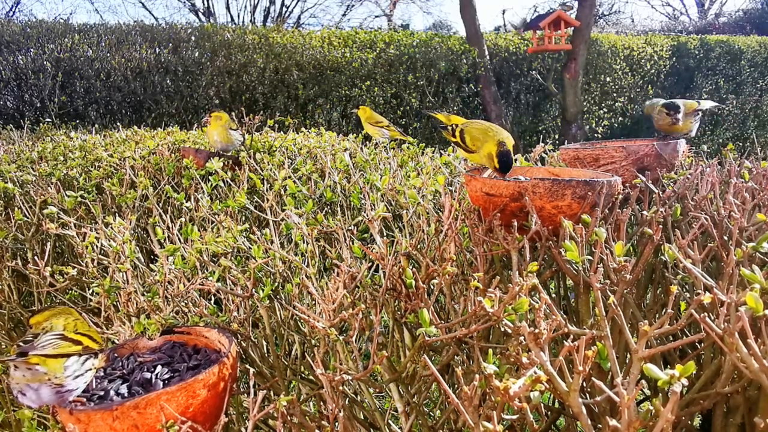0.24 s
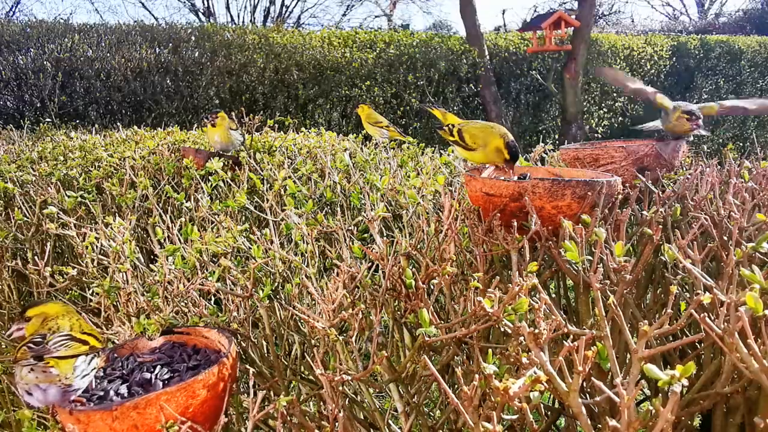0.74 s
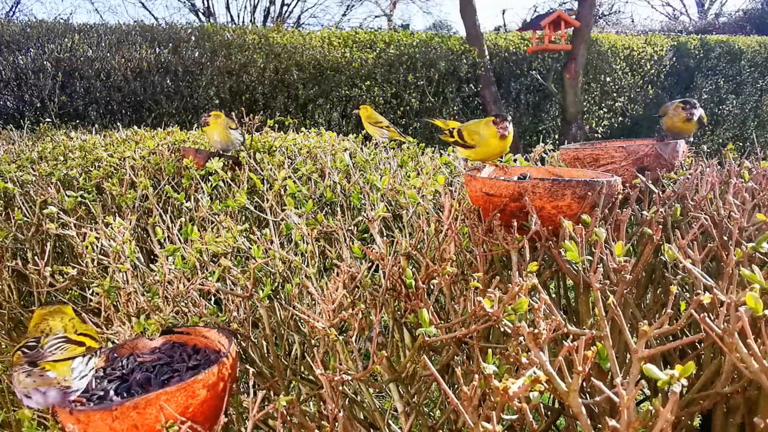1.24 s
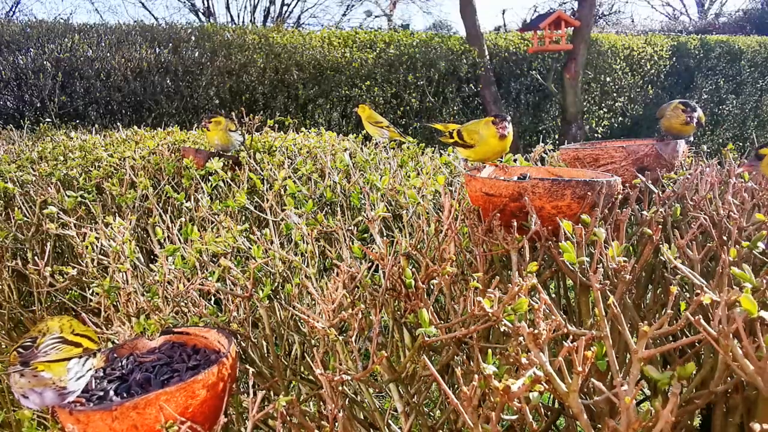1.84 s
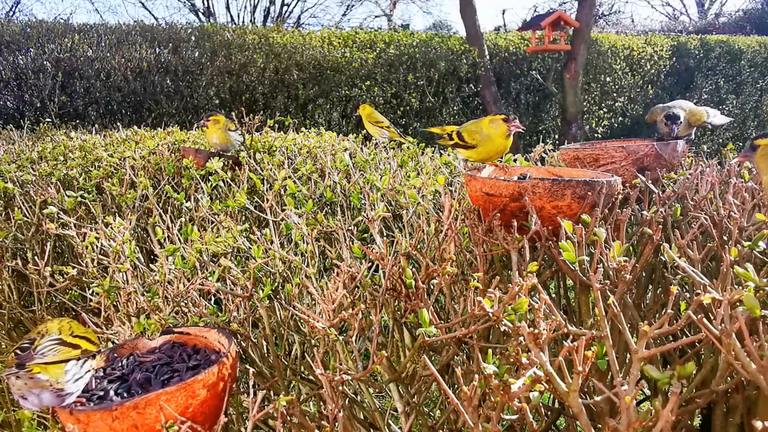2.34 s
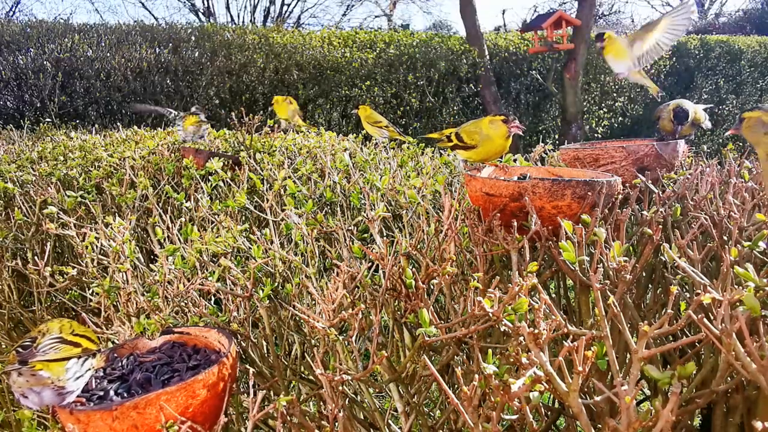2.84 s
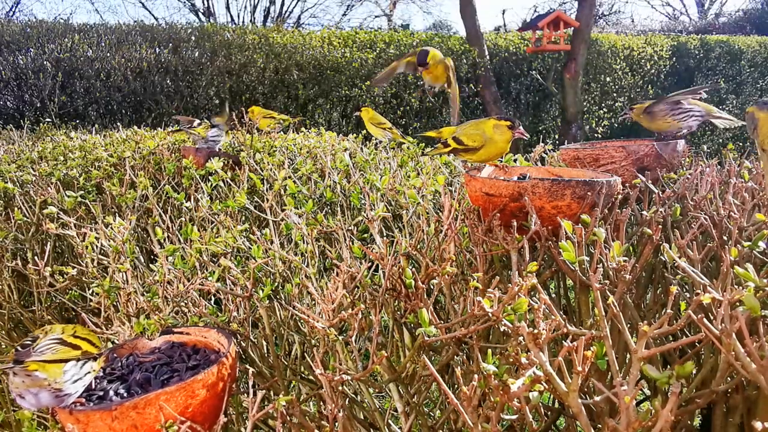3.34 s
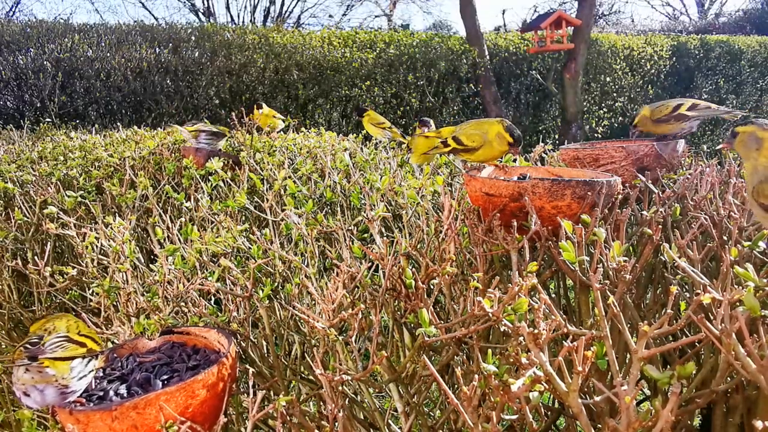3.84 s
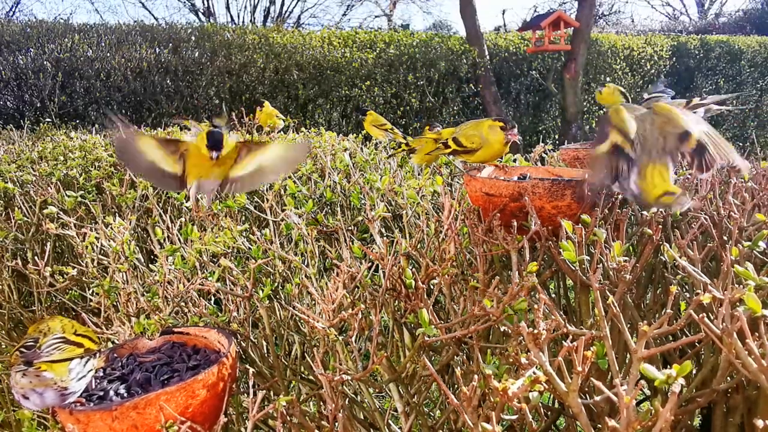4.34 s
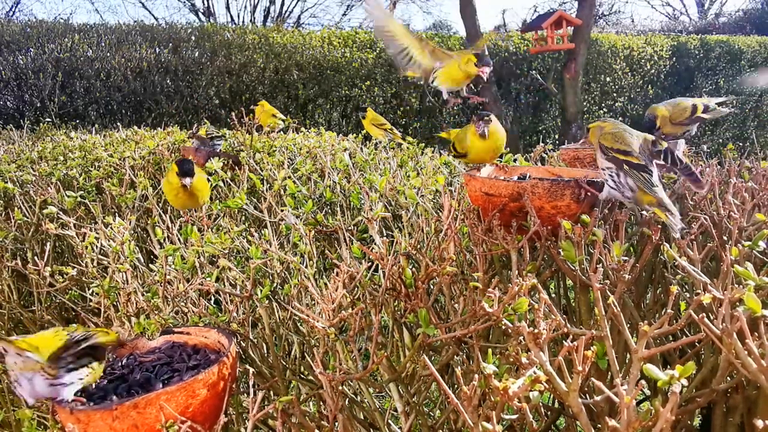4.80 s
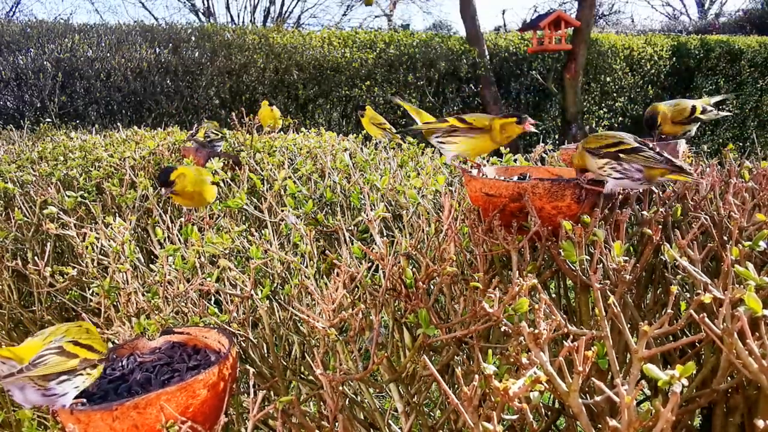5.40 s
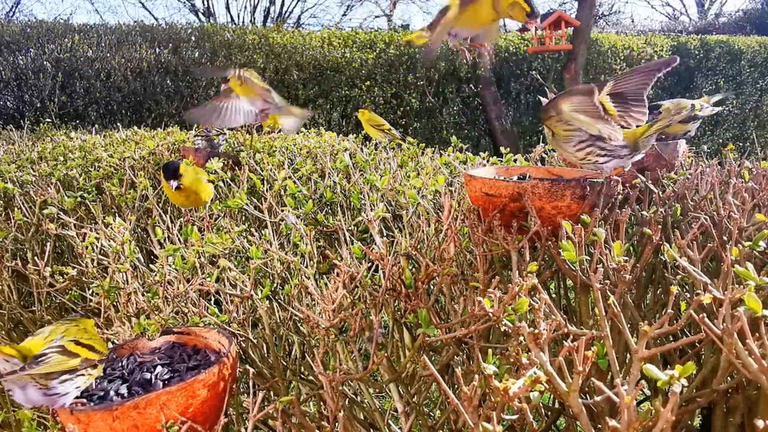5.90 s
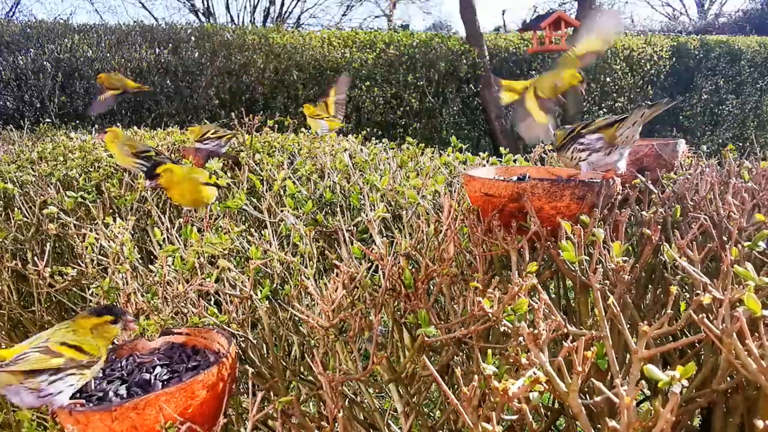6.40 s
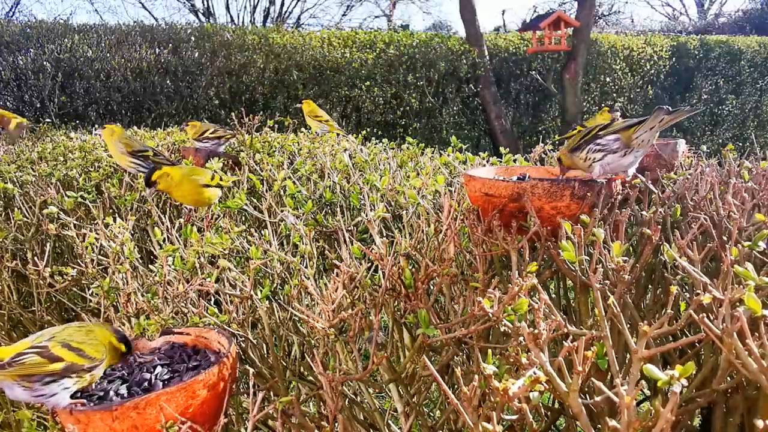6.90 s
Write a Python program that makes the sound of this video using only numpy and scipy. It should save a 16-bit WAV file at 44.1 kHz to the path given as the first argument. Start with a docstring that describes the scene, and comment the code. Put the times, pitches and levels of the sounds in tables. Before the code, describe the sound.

Siskins squabble at seed feeders along a hedge: high sliding whistles, tiny chirps and scratchy bursts, fairly sparse at first, then busier. Soft whirring wingbeats come and go, heaviest around five to six and a half seconds, ending in scrabbling and pecking among husks. A dove coos far off throughout, and twitter hangs in the leaves. Short outdoor echoes, a quiet hush and low puffs of air reach the nearby stereo microphone.

```python
"""A garden hedge with seed feeders, where siskins whistle, chatter and squabble close by.
Whistles are gliding tones; chatter is shaky harmonics mixed with noise and shaped by a throat filter.
Wings whirr in bursts of beats, beaks and claws tick on seeds and twigs, and hedge and walls echo the birds.
Further off the flock twitters and a collared dove repeats its three-note coo.
A light breeze, with puffs of air from the wings, and the garden's hush are filtered noise."""
import sys
import numpy as np
from scipy import signal
from scipy.fft import rfft, irfft, next_fast_len
from scipy.io import wavfile

SR = 44100
rng = np.random.default_rng(int(sys.argv[2]) if len(sys.argv) > 2 else 0)


def master(y):
    """Save y as 16-bit WAV."""
    cut = np.clip(np.atleast_2d(y).T, -1, 1)
    pcm = np.round(cut * 32767)  # scale
    wavfile.write(sys.argv[1], SR, pcm.astype(np.int16))


N = 315315

# Levels in the tables are relative: many layers are trimmed as a whole later on.
# Falling whistles: t/s, length/s, first f/Hz, last f/Hz, bend (over 1 hangs before the dive, under 1 dives
# at once), level/dB, loudest moment (share of the length), roughness (0-1)
FALLING_WHISTLES = [(0.182, 0.18, 4250, 1950, 2.73, -50.5, 0.8, 0.03),
                    (0.229, 0.13, 5350, 2254, 1.44, -49.5, 0.3, 0.11),
                    (0.582, 0.074, 4580, 3220, 0.92, -51, 0.16, 0.63),
                    (1.14, 0.13, 5500, 2470, 1.44, -40, 0.095, 0.12),
                    (1.355, 0.13, 6280, 1983, 0.99, -41.5, 0.27, 0.13),
                    (2.012, 0.075, 5230, 4510, 0.83, -42, 0.32, 0.05),
                    (2.066, 0.2, 4740, 2130, 1.24, -51, 0.44, 0),
                    (2.546, 0.1, 5560, 2740, 2, -38.5, 0.69, 0.23),
                    (2.756, 0.125, 5860, 1970, 1.1, -45, 0.42, 0.15),
                    (2.894, 0.06, 2460, 1665, 1.2, -47, 0.095, 0.28),
                    (2.909, 0.1, 4500, 2650, 0.84, -48.5, 0.33, 0.3),
                    (3.09, 0.1, 5800, 4460, 0.73, -55.5, 0.4, 0),
                    (3.506, 0.071, 5540, 4460, 0.73, -42.5, 0.28, 0),
                    (3.579, 0.16, 4660, 2560, 0.82, -48.5, 0.52, 0.06),
                    (3.836, .15, 5630, 1990, 0.9, -50.5, 0.55, 0.13),
                    (4.461, .11, 5530, 2003, 1.06, -44, 0.38, 0.39),
                    (4.5, .18, 4994, 4210, 0.61, -45.5, 0.31, 0),
                    (4.999, .11, 4830, 2640, 0.94, -39, 0.46, .15),
                    (5.877, 0.15, 4780, 2773, 0.97, -48, 0.57, 0.06),
                    (6.917, 0.096, 5573, 2510, 1.6, -35.5, 0.36, 0.24),
                    (7.096, 0.043, 4300, 3307, 0.69, -45.5, 0.54, 0.5)]
# Short tweets and thin held notes: t/s, length/s, first f/Hz, last f/Hz, level/dB, roughness (0-1)
TWEET_NOTES = [(0, 0.032, 4540, 4490, -47.5, 0.24), (0.818, 0.061, 4690, 4157, -44, 0.83),
               (0.866, 0.05, 4240, 5100, -49, 0.5), (1.137, 0.032, 5580, 5620, -40, 0),
               (1.486, 0.17, 4016, 4040, -56.5, 0.17), (1.55, 0.028, 4500, 4720, -45, 0),
               (1.597, 0.04, 5500, 5630, -60.5, 0.04), (1.931, 0.03, 5070, 3750, -55.5, 0.54),
               (1.967, 0.062, 6100, 5530, -57, 0.14), (2.393, 0.067, 4270, 4440, -60.5, .1),
               (2.4, 0.06, 5650, 5650, -65, 0), (2.86, 0.042, 2300, 3220, -50.5, 0.4),
               (3.09, 0.069, 6200, 5900, -57, 0), (3.187, 0.045, 4610, 5130, -56.5, 0.25),
               (3.426, 0.037, 4010, 4220, -49, 0.16), (3.43, 0.066, 6250, 6610, -56.5, 0.27),
               (3.485, 0.026, 4470, 4920, -46, 0.27), (3.563, 0.043, 4850, 4560, -47.5, 0),
               (3.727, 0.021, 4450, 4800, -46.5, 0.08), (4.122, 0.057, 4000, 5133, -46.5, 0.62),
               (4.544, 0.073, 5370, 5130, -52, 0), (4.856, 0.014, 3300, 3660, -48, 0.24),
               (4.918, 0.0197, 3464, 3990, -44.5, 0.24), (4.941, 0.033, 5500, 5910, -49.5, 0.1),
               (4.948, 0.068, 2815, 3510, -42.5, 0.81), (4.969, 0.051, 4120, 5040, -52, 0.56),
               (5.019, 0.069, 5990, 5260, -49, 0.58), (5.132, 0.023, 3840, 4020, -40.5, 0.2),
               (5.428, 0.0268, 3680, 3503, -51, 0.12), (5.525, 0.022, 4440, 5000, -52, 0.3),
               (5.866, 0.056, 4430, 4560, -48, 0.13), (5.982, 0.048, 4234, 4230, -51, 0.03),
               (6.703, 0.062, 3663, 3830, -56, 0.2), (6.787, 0.15, 4870, 5170, -61.5, 0.42),
               (6.836, 0.1, 4050, 4010, -56, 0.05)]
HOOK_S = .022  # every whistle opens with a faint upward hook
BEAK_HZ, LOW_NOTE_DB = 4260, -7.5  # a small beak radiates low notes poorly: dB an octave below this pitch
TWIN_RATIO, TWIN_DB = .87, -10  # the other side of the syrinx (the voice organ) sings lower and weaker

# Harsh chatter notes: middle t/s, length/s, level/dB, centre f/Hz,
# narrowness/dB (drop an octave off centre, sign ignored), left over right/dB
CHATTER_NOTES = [(.082, 0.027, -42, 4570, 2.5, 0), (.39, 0.099, -36, 4050, 20, 1),
                 (.445, 0.062, -44.5, 3530, 13, 1), (0.663, 0.097, -38.5, 4950, 4.5, -1),
                 (0.709, 0.034, -27.5, 1960, 5.5, -2.5), (0.857, 0.056, -33, 5200, 6, 1),
                 (2.468, 0.045, -38, 3760, 3, 3), (2.54, 0.049, -27.5, 5500, -1, 0),
                 (2.592, 0.027, -33.5, 5000, -1, -1), (2.66, 0.026, -31, 5600, 0.5, -0.5),
                 (2.745, 0.029, -30.5, 7000, 0.5, -0.5), (3.225, .07, -44.5, 4200, 33, -4),
                 (3.289, 0.036, -45, 3600, 2, 1), (3.355, 0.036, -39, 4240, 9, 0.5),
                 (3.587, 0.034, -35, 5170, 2.5, 1), (3.652, 0.027, -35, 3930, 3, 2),
                 (3.727, 0.025, -34.5, 4260, 3, 1), (4.167, 0.037, -32.5, 3760, 10, 0),
                 (4.277, 0.042, -37, 3760, 12, -1), (4.325, 0.039, -35, 4120, 4, 0),
                 (4.352, 0.036, -31.5, 3760, 8, 0), (4.444, 0.064, -29.5, 6100, 2.5, 2),
                 (4.519, 0.032, -34.5, 4600, 3.5, 0), (4.617, 0.037, -33.5, 3850, 17, -1.5),
                 (5.187, 0.039, -20.5, 5760, 3, 2.5), (5.275, 0.041, -34, 3700, 13, -3),
                 (5.3, 0.029, -20, 3460, 1.5, 0.5), (5.372, 0.023, -29, 5900, 0, -10),
                 (5.453, 0.035, -30.5, 5050, 2.5, -5), (5.526, 0.034, -29, 6290, 2, -1),
                 (5.648, 0.031, -35, 4860, 2, -5), (5.695, 0.058, -38, 5170, 0.5, 1),
                 (5.743, 0.037, -36.5, 3970, 4.5, -4), (5.774, 0.044, -38.5, 4670, 3.5, 0),
                 (5.851, 0.052, -34.5, 4300, 5, -1)]
# Filter of the throat: f/Hz, level/dB
THROAT_FILTER = [(900, -25.5), (1450, -6), (2300, 1), (5000, 5), (7000, 0), (8500, -9.5), (11000, -4.5),
                 (15000, -19)]

# Bursts of wingbeats: t/s, length/s, beats per second, air push level/dB, feather swish level/dB,
# left over right/dB
WING_BURSTS = [(0.662, 0.32, 21.5, -54, -59.5, 0), (1.838, 0.11, 23, -39, -77, -4),
               (2.721, 0.42, 20.5, -47, -56, 1.5), (3.966, 0.28, 22.7, -68, -55, 1),
               (5.077, 0.416, 22, -24, -53, 2.5), (5.597, 0.095, 23, -38, -79, 19),
               (6.112, 0.29, 20.1, -36.5, -54.5, -0.5), (6.303, 0.3123, 26, -33.5, -52.5, 3),
               (6.38, 0.34, 23.5, -44, -52.5, -0.5), (6.549, 0.16, 23.5, -44, -51.5, 3),
               (6.984, 0.18, 20.4, -41, -50.5, -2)]
# Colour of the feather swish: f/Hz, level/dB
FEATHER_COLOUR = [(300, 7.5), (1100, 1.5), (2500, 7), (6000, -7), (9000, 1), (11000, 0), (15000, -11.5)]
# Colour of the duller wing whirr: f/Hz, level/dB
WHIRR_COLOUR = [(40, -11.5), (170, 5), (450, -13), (900, -20.5), (3000, -38)]

# Ticks of beak or claw: t/s, level/dB, centre f/Hz, left over right/dB
BEAK_AND_CLAW_TICKS = [(0.162, -31, 5000, -2), (0.7244, -31.5, 6500, -5.5), (1.3129, -37, 5430, -4),
                       (1.7462, -50, 4380, -12), (1.8674, -48.5, 4700, -18), (6.4258, -24.5, 7975, 0),
                       (6.5099, -26, 1499, -1), (6.55, -31, 7500, -5), (6.562, -21.5, 1400, 3),
                       (6.622, -28, 5000, -3), (7.0365, -18.5, 7500, -2)]
# Colour of a cracking husk: f/Hz, level/dB
HUSK_COLOUR = [(300, 13), (1500, 9), (4000, 7), (8000, 9), (11000, 7.5), (16000, 1.5)]
RUSTLE_FROM_S, RUSTLE_TO_S = 6.15, 6.69  # a landing bird scrabbles for a hold among the seeds

# Loudness of the flock twittering in the hedge: t/s, level/dB
FLOCK_LEVEL = [(0, -56), (0.4, -55), (1.1, -58), (1.65, -66), (2.35, -70), (2.69, -57), (3.05, -62),
               (3.55, -55), (3.96, -62), (4.4, -53), (4.72, -65), (4.95, -52), (5.35, -47), (5.62, -59),
               (6.21, -63), (6.97, -62), (7.15, -48)]

# The dove's phrase, one row a coo: t/s into the phrase, length/s, length/s of its low opening,
# top f/Hz, last f/Hz, level/dB
DOVE_COOS = [(0, .22, .06, 690, 668, -1.5), (.30, .46, .05, 668, 555, -2.5),
             (.98, .25, .035, 655, 470, -1.5)]
FIRST_PHRASE_S, PHRASE_EVERY_S = -.677, 1.617
COO_LOW_HZ, COO_LOW_DB = 512.5, 7  # every coo opens on a louder low note, then breaks upward

# Air moving over the microphone, easing at first and then freshening: t/s, level/dB
BREEZE_LEVEL = [(0, -61), (2.1, -69.5), (3.4, -59), (4.9, -48.5), (6.3, -49), (7.15, -48)]
# Colour of the breeze: f/Hz, level/dB
BREEZE_SPECTRUM = [(15, 0), (30, -4.5), (55, 1), (80, -7), (130, -14.5), (250, -20), (600, -35),
                   (2000, -47)]
# Swells and short puffs of low air, many of them stirred by passing wings:
# peak t/s, half width/s, peak level/dB
AIR_PUFFS = [(.8, 0.51, -55.5), (1.89, 0.028, -50.5), (2.3, 1, -58.5), (3.02, 0.14, -59.5),
             (3.698, 0.062, -49), (5.33, 0.33, -45), (5.65, 0.051, -45.5), (5.94, 0.089, -51),
             (7.13, 0.18, -39.5)]
# Colour of the garden's hush: f/Hz, level/dB per Hz
GARDEN_COLOUR = [(59, -42), (100, 9), (146, -21.5), (214, 2), (364, -14), (568, -6), (1220, -17.5),
                 (2200, -9), (4720, -14), (6220, -13), (7530, -16), (11000, -20.5), (15800, -22)]
GARDEN_DB = -63

# Reflections from ground, hedge and walls: delay/s, level/dB
REFLECTIONS = [(.005, -2), (.011, -9.5), (.02, -15), (.032, -16), (.044, -7.5), (.07, -15.5)]
ECHO_SPREAD_S = .001
LINGER_DB = -16  # the whistles carry far enough to linger among the trees
# The left microphone port is a little duller than the right: f/Hz, level/dB added left and taken right
LEFT_RIGHT_TILT = [(70, -1.06), (400, -2), (3000, -0.84), (9000, -2.7)]
EDGE_HZ = 15900  # upper limit of the sound


def whistle(length, first_hz, last_hz, bend, rough, peak, edge_db,
            jitter=0.1117, octave_db=-22, hook=0.0812, hook_db=-9):
    """A syrinx tone hooks up to its first pitch, then glides to its last; roughness shakes it and adds octave."""
    t = np.arange(-HOOK_S, length, 1 / SR)
    dive = np.sin(np.pi / 2 * np.maximum(t / length, 0) ** bend) ** 2
    early = np.maximum(-t / HOOK_S, 0)  # falls from 1 to 0 during the hook

    glide = first_hz * (last_hz / first_hz) ** dive * (1 - hook * early)
    glide *= 1 + (.004 + .04 * rough) * wobble(len(t), 240)
    shaken = glide * (1 + jitter * rough * wobble(len(t), 2200))
    phase = 2 * np.pi * np.cumsum(shaken) / SR

    off_peak = np.interp(t, [0, np.clip(peak, .05, .95) * length, length], [1, 0, 1])
    swell = amp(hook_db * early - edge_db * off_peak ** 2) * signal.windows.tukey(len(t), .1)
    swell *= amp((2.6 + 2 * rough) * wobble(len(t), 275.8))
    swell *= amp(LOW_NOTE_DB * np.maximum(np.log2(BEAK_HZ / glide), 0))

    octave_gain = amp(octave_db + 18.0 * rough + 5.2 * wobble(len(t), 180.0))
    octave = octave_gain * np.sin(2 * phase + 1.1 * wobble(len(t), 1700))
    return swell * np.sqrt(2) * (np.sin(phase) + octave * (glide / 5000) ** 2)


def whistles(pan_db=1.5, slur_edge_db=12, tweet_edge_db=9):
    """The near birds' two-voiced falling whistles and their tweets, at slightly scattered left-right places."""
    out = np.zeros((2, N))
    calls = []
    for s, length, first, last, bend, db, peak, rough in FALLING_WHISTLES:
        for ratio, voice_db in [(1, 0), (TWIN_RATIO, TWIN_DB)]:
            call = whistle(length, ratio * first, ratio * last, bend, rough, peak, edge_db=slur_edge_db)
            calls.append((s, db + voice_db, call))
    for s, length, first, last, db, rough in TWEET_NOTES:
        call = whistle(length, first, last, bend=0.59, rough=rough, peak=0.31, edge_db=tweet_edge_db)
        calls.append((s, db, call))
    for s, db, call in calls:
        add(out, s - HOOK_S, amp(db) * call, pan_db, lag_s=rng.uniform(-0.000079, .00008))
    return out


def chatter(pitch_hz=1560, arch=0.22, jitter=0.0792, rasp=1.0, level_db=-6.5):
    """Harsh notes: shaky arched harmonics and rasping air pass through the throat, sputtering unevenly."""
    out = np.zeros((2, N))
    for s, length, db, hz, narrow_db, pan in CHATTER_NOTES:
        u = np.linspace(-1, 1, int(length * SR))  # from start to end of the note
        own_hz = pitch_hz * rng.uniform(.93, 1.12)
        pitch = own_hz * (1 - arch * u ** 2) * (1 + jitter * wobble(len(u), 1484))
        turns = np.cumsum(pitch) / SR
        stack = unit(sum(np.sin(2 * np.pi * k * turns) for k in range(1, 11)))
        sputter = amp(3 * wobble(len(u), 600))
        air = rng.standard_normal(SR)[:len(u)]
        voice = colour((stack + rasp * air) * sputter, THROAT_FILTER)
        note = unit(focus(voice, hz, abs(narrow_db))) * np.cos(u * np.pi / 2) ** 2
        add(out, s - length / 2, amp(db + level_db) * note, pan, lag_s=rng.uniform(-0.00012, .0002))
    return out


def wings(push_s=0.0031, swish_s=0.017, flap_hz=220, flap_s=0.0021, flap_rise_s=0.00672,
          flap_db=-10, crackle_db=4.5):
    """Each beat sucks then pushes the air, with a short rising flap, a whirr and a crackling feather swish."""
    out = np.zeros((2, N))
    t = np.arange(-.03, .05, 1 / SR)
    push = t / push_s * np.exp(.5 - .5 * (t / push_s) ** 2) * np.where(t < 0, 1, .65)
    stroke = np.exp(-abs(t) / swish_s) + 0.68 * np.hanning(len(t))
    flap_turns = np.cumsum(flap_hz * np.exp(np.clip(t / flap_rise_s, -2, 2))) / SR
    flap = np.sin(2 * np.pi * flap_turns) * np.exp(-abs(t - flap_s / 2) / flap_s)
    for s, length, rate, push_db, swish_db, pan in WING_BURSTS:
        for beat in np.arange(0, length, 1 / rate):
            # beats are strongest mid-burst, and each differs by chance
            arch = np.sin(np.pi * (beat + .5 / rate) / (length + 1 / rate)) ** 2
            effort = (.2 + .8 * arch ** 1.5) * amp(rng.standard_normal())
            feathers, air = rng.standard_normal((2, len(t)))
            crackle = amp(crackle_db * np.minimum(wobble(len(t), 917.0), 2))
            feathers = unit(colour(feathers * crackle, FEATHER_COLOUR))
            whirr = unit(colour(air, WHIRR_COLOUR))
            thump = amp(push_db) * (effort * push + amp(flap_db) * flap)
            swish = amp(swish_db) * stroke * (feathers + whirr)
            add(out, s + beat + t[0], effort * (thump + swish), pan, lag_s=0.00017)
    return out


def ticks(decay_s=0.0018, stray_db=-54, level_db=-1):
    """Husks crack and claws catch on twigs as short fading noise; mostly fainter pecks fall at random."""
    out = np.zeros((2, N))
    t = np.arange(-.002, .02, 1 / SR)
    stray = [(a * N / SR, stray_db + 10 * b, 5000 + 5000 * c, -3) for a, b, c in rng.random((24, 3))]
    for s, db, hz, pan in list(BEAK_AND_CLAW_TICKS) + stray:
        burst = rng.standard_normal(len(t)) * (t > 0) * np.exp(-abs(t) / decay_s)
        crack = focus(colour(burst, HUSK_COLOUR), hz, slope_db=0.5)
        add(out, s + t[0], amp(db + level_db) * crack / abs(crack).max(), pan, lag_s=.0001)
    return out


def rustle(level_db=-42, swell_db=9, tilt_db=-1.9):
    """Seeds and dry twigs crackle in uneven clumps of tiny ringing snaps, each at its own pitch, growing louder."""
    span_s = RUSTLE_TO_S - RUSTLE_FROM_S
    along = (np.arange(N) / SR - RUSTLE_FROM_S) / span_s
    out = np.zeros((2, N))
    t = np.arange(0, .008, 1 / SR)
    clumps = amp(3 * wobble(N, 70))
    for when, pitch, size, side in rng.random((420, 4)):
        s = RUSTLE_FROM_S + when * span_s
        hz = 500 * 24 ** pitch
        snap = np.sin(2 * np.pi * hz * t) * np.exp(-hz * t / .8)
        db = tilt_db * np.log2(hz / 2000) + 17 * size ** 3  # a few snaps are much louder
        add(out, s, amp(db) * unit(snap), pan_db=8 * (side - .9), lag_s=.0003 * side)
    inside = (along > 0) & (along < 1)
    swell = amp(level_db + swell_db * (np.clip(along, 0, 1) - 2.0))
    return out / out[:, inside].std() * clumps * swell


def flock():
    """Many small chirps deep in the hedge, most of them falling, blurred into one twitter by the leaves."""
    out = np.zeros(N)
    for length, pitch, slide in rng.random((28, 3)):
        hz = 2500 + 3100 * pitch
        note = whistle(.015 + .03 * length, hz, hz * (.7 + .4 * slide), bend=1, rough=.45, peak=.4,
                       jitter=.1, edge_db=12)
        starts = 1. * (rng.random(N) < 7 / SR)  # about seven a second
        out += signal.oaconvolve(starts, note)[:N]
    blurred = scatter(out[None], t60=.2)
    out = colour(blurred, [(1500, 8), (2500, 3), (5300, 0), (6500, -5), (11000, -2)])
    return unit(out) * amp(np.interp(np.arange(N) / SR, *np.transpose(FLOCK_LEVEL)))


def dove(level_db=-56, tail_db=-4, sag_bend=1.3, fade_db=1.0, leap_s=0.012, scoop=0.065,
         wall_s=0.055, wall_db=-8):
    """Each coo starts low, breaks upward and sinks; a far wall repeats it and distance smears it."""
    out = np.zeros((2, N))
    for start in np.arange(FIRST_PHRASE_S, N / SR, PHRASE_EVERY_S):
        for s, length, low_s, top_hz, last_hz, db in DOVE_COOS:
            t = np.arange(0, length, 1 / SR)
            opening = np.minimum(t / low_s, 1)
            high = np.clip((t - low_s) / leap_s + .5, 0, 1)  # 0 on the low note, 1 after the break
            sunk = np.clip((t - low_s) / (length - low_s), 0, 1) ** sag_bend
            low_hz = COO_LOW_HZ * (1 + scoop * (opening - .5))
            high_hz = top_hz + (last_hz - top_hz) * sunk
            hz = (1 - high) * low_hz + high * high_hz
            phase = 2 * np.pi * np.cumsum(hz * (1 + .008 * wobble(len(t), 58.5))) / SR
            swell = amp(level_db + db + COO_LOW_DB * np.sin(np.pi * opening) - fade_db * sunk)
            swell *= signal.windows.tukey(len(t), .08)
            add(out, start + s, swell * np.sin(phase), pan_db=-2.0, lag_s=0.00042)
    far_wall = amp(wall_db) * np.pad(out, ((0, 0), (round(abs(wall_s) * SR), 0)))[:, :N]
    return out + far_wall + 0.75 * echoes(out) + amp(tail_db) * scatter(out, t60=0.35)


def outdoors(level_db=2, garden_sway_db=2.5):
    """Low filtered noise makes the breeze and puffs of air at the microphone; wider noise the garden's hush."""
    t = np.arange(N) / SR
    puffs = sum(amp(db) * np.exp(-((t - s) / width) ** 2) for s, width, db in AIR_PUFFS)
    moving_air = amp(np.interp(t, *np.transpose(BREEZE_LEVEL))) + puffs
    air = pair(likeness=.78) * amp([[3.3], [-3.3]])  # stronger on the left
    breeze = amp(level_db) * unit(colour(air, BREEZE_SPECTRUM)) * moving_air
    hush = unit(colour(pair(likeness=0.11), GARDEN_COLOUR))
    return breeze + hush * amp(GARDEN_DB + garden_sway_db * wobble(N, 6.1))


def echoes(x):
    """Reflections, each broken by twigs and rough brick into a short cluster that differs left and right."""
    taps = np.zeros((2, SR // 6))
    for delay, db in REFLECTIONS:
        for side in range(2):
            late = rng.exponential(1, size=6)
            size = rng.standard_normal(size=6)
            at = (abs(delay + ECHO_SPREAD_S * late) * SR).astype(int)
            at = np.minimum(at, taps.shape[1] - 1)
            taps[side, at] += amp(db) * size / np.linalg.norm(size)
    return signal.fftconvolve(x, taps, axes=1)[:, :N]


def scatter(x, t60):
    """Leaves and fences throw back a blurred tail: noise that fades by 60 dB in t60 seconds."""
    t = np.arange(SR) / SR
    tail = rng.standard_normal((2, SR)) * amp(-60 * t / t60) * (1 - np.exp(-t / 0.0033))
    return signal.fftconvolve(x, tail / np.linalg.norm(tail[0]), axes=1)[:, :N]


def add(mix, s, sound, pan_db=0, lag_s=0):
    """Mixes a sound in at a time and a left-right balance; it reaches the left side lag_s later."""
    for side, sign in enumerate((1, -1)):
        start = round((s + sign * lag_s / 2) * SR)
        rest = sound[max(-start, 0):]
        part = mix[side, max(start, 0):][:len(rest)]
        part += amp(sign * pan_db / 2) * rest[:len(part)]


def focus(x, hz, slope_db):
    """A broad resonance, slope_db down an octave to each side and ever steeper beyond, to a floor of -35 dB."""
    octaves = np.linspace(-3, 3, 13)
    return colour(x, np.transpose([hz * 2 ** octaves, np.maximum(-slope_db * octaves ** 2, -35)]))


def colour(x, points):
    """Filters by a spectrum of f/Hz, level/dB points."""
    hz, db = np.transpose(points)
    size = next_fast_len(x.shape[-1] + 512)
    gain = amp(np.interp(np.log(np.fft.rfftfreq(size, 1 / SR) + 1), np.log(hz), db))
    return irfft(rfft(x, size) * gain, size)[..., :x.shape[-1]]


def wobble(size, rate):
    """Random drift of about unit size: straight lines between new values drawn rate times a second."""
    at = np.arange(size) * rate / SR
    return np.interp(at, np.arange(4096), rng.standard_normal(4096))


def pair(likeness):
    """Two channels of partly shared noise."""
    a, b = rng.standard_normal((2, N))
    c = np.clip(likeness, 0, 1)
    return np.array([a, c * a + np.sqrt(1 - c * c) * b])


def unit(x):
    """Scales to an rms (average strength) of one."""
    return x / np.sqrt(np.mean(x ** 2) + 1e-20)


def amp(db):
    """Turns decibels into a gain."""
    return 10 ** (np.asarray(db) / 20)


def scene():
    """Near birds with the garden's echoes, then the distant layers."""
    song = whistles()
    sharp = chatter() + ticks() + wings() + rustle()
    near = song + amp(-9.0) * sharp  # what the hedge and walls throw back
    tail = amp(-7.5) * scatter(near + .5 * focus(sharp, 4200, 8), t60=.3)
    linger = amp(LINGER_DB) * scatter(focus(song, 3300, 4), t60=.4)
    return song + sharp + echoes(near) + tail + linger + flock() + dove() + outdoors()


def record(dry):
    """Gives the two microphone ports slightly different colours, then cuts the highest treble."""
    left = colour(dry[0], LEFT_RIGHT_TILT)
    right = colour(dry[1], [(hz, -db) for hz, db in LEFT_RIGHT_TILT])
    low_pass = signal.firwin(401, EDGE_HZ, window=("kaiser", 9), fs=SR)
    return signal.oaconvolve(np.array([left, right]), low_pass[None], "same")


dry = scene()
out = record(dry)
master(out)
```